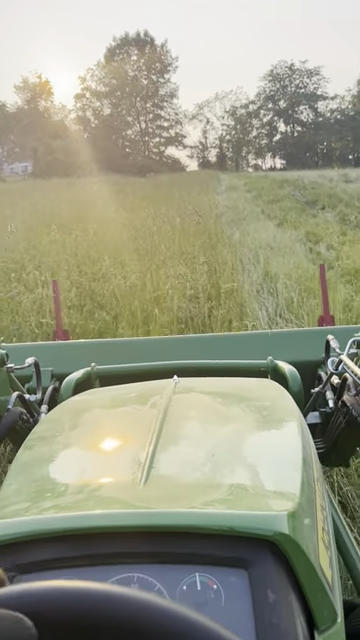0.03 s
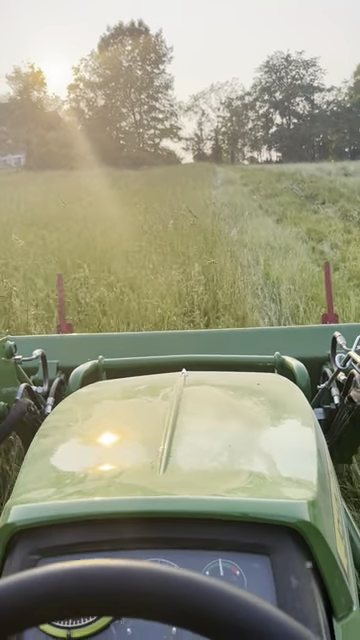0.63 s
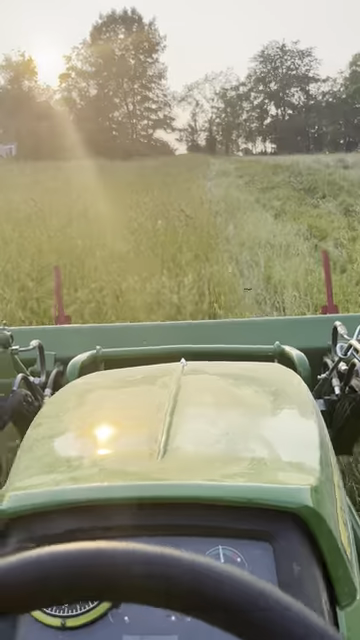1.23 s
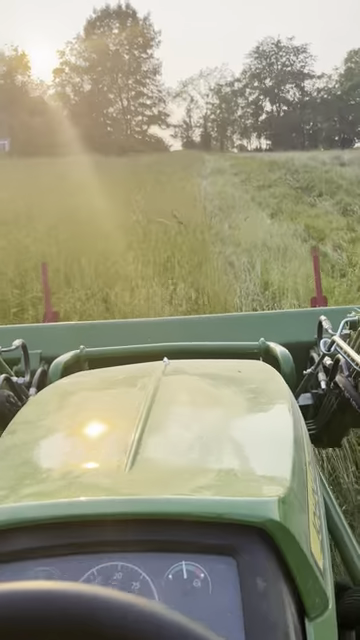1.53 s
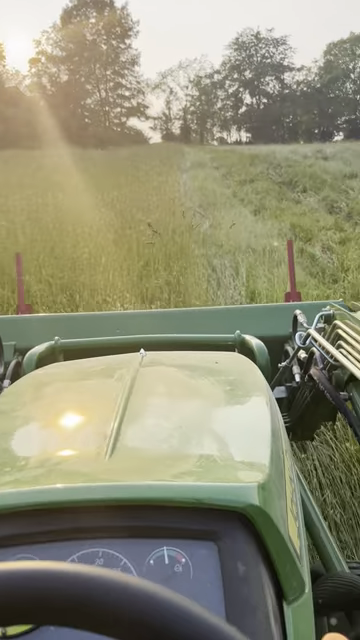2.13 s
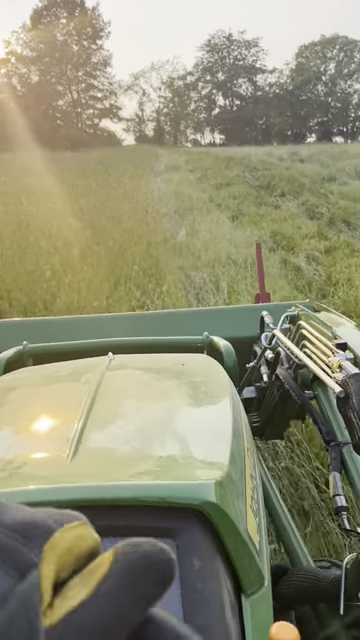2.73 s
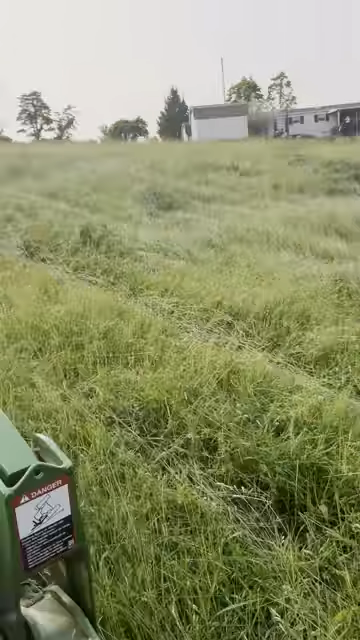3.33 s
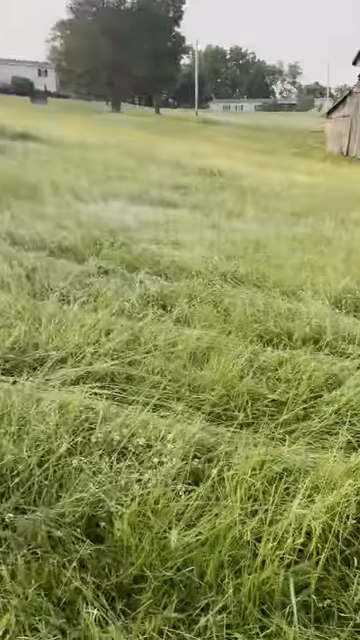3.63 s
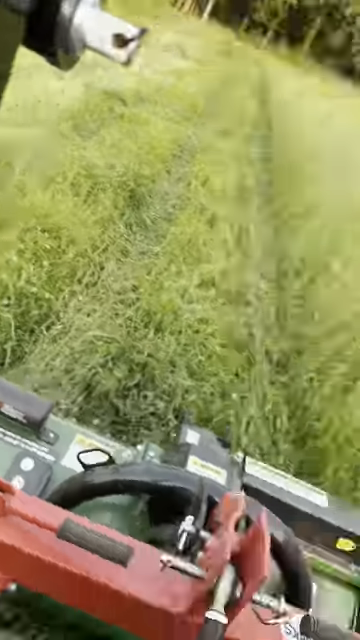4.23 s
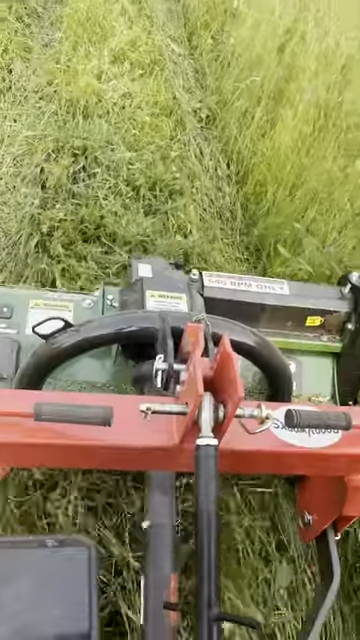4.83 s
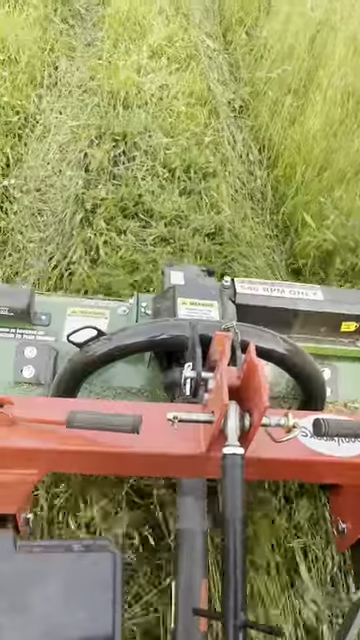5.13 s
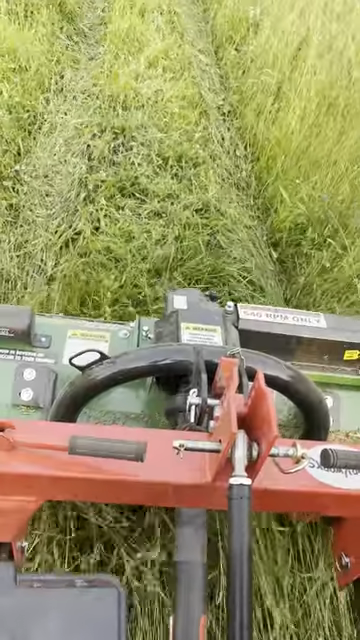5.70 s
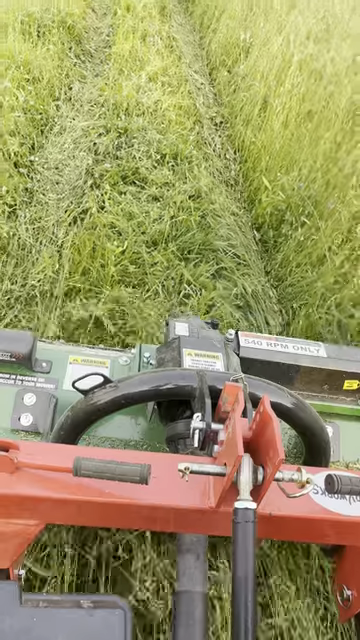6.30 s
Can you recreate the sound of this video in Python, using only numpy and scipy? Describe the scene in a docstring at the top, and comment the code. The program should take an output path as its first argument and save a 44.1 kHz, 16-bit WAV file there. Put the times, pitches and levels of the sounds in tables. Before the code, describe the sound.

Steady diesel engine drone from a tractor seat, shifting midway to the pulsing growl and ringing hiss of a mower cutting grass.

```python
"""A three-cylinder diesel tractor at close range, pulling a flail mower through a field of tall grass.
The microphone is a stereo phone in the open driver's seat. Just ahead, the exhaust pulses drone,
combustion knocks the block and the timing gears whine. Behind, the drive shaft makes the gearbox throb
and flails pelt the mower's steel hood with grass. Near four seconds the phone swings from the bonnet
round to the mower."""
import sys
import numpy as np
from scipy import signal
from scipy.fft import rfft, irfft
from scipy.io import wavfile

SR = 44100
rng = np.random.default_rng(int(sys.argv[2]) if len(sys.argv) > 2 else 0)


def wav_record(signal):
    """Record a signal, one row per channel, as 16-bit PCM in the file named by sys.argv[1]."""
    frames = np.transpose(np.atleast_2d(signal))
    bounded = np.clip(frames, -1, 1)
    # unit amplitude maps onto the largest positive 16-bit level
    quanta = np.round(bounded * 32767).astype(np.int16)
    wavfile.write(sys.argv[1], SR, quanta)


N = 284886
T = np.arange(N) / SR
FREQ = np.fft.rfftfreq(N, 1 / SR)


# exhaust lines, just ahead of the seat: (order [per cycle], relative level [dB], shading [dB per dB])
EXHAUST_LINES = [(2, -26.5, 0.26), (3, 0.5, 1.09), (4, -18, 0.61), (6, -3.5, 1.92), (7, -26, 0.2),
                 (9, -15.5, 4.2), (15, -18.5, 1.2)]

def exhaust(cycle):
    """Three firings per two-turn cycle make steep pulses; unequal cylinders add weak lines between."""
    level_db = facing(-19, -22.5, -25)
    top_db = np.max(level_db)
    out = 0
    for k, db, shading in EXHAUST_LINES:
        lead_turns = .25 * (k > 4)  # leading overtones steepen the front
        line = tone(round(k) * cycle + lead_turns, waver_db=.055 * k, waver_rad=.008 * k)
        # each line fades at its own rate as the microphone turns away
        out = out - line * undb(top_db + db + shading * (level_db - top_db))
    return out


# roar of the block under the bonnet: (frequency [Hz], level [dB per Hz])
BLOCK_ROAR = [(25, -80), (40, -70), (60, -56.5), (130, -57), (230, -48), (330, -49), (480, -56),
              (700, -56.5), (1400, -66.5), (2350, -69), (2800, -71.5), (3500, -72), (5000, -77.5),
              (7000, -79.5), (15500, -93.5)]
# modes of the engine covers: (frequency [Hz], width [Hz], peak level [dB per Hz])
COVER_MODES = [(1310, 70, -61), (2426, 150, -66), (3420, 630, -71), (6180, 470, -73), (6890, 310, -74),
               (7380, 300, -89)]

def block():
    """Diesel clatter: a broad roar with the ringing of the covers."""
    covers = modes(COVER_MODES)
    return (colour(hiss(), BLOCK_ROAR) + covers) * undb(.81 * walk(4.5))


# combustion knock, close ahead: (frequency [Hz], level [dB per Hz])
KNOCK_SPECTRUM = [(40, -86), (150, -65), (300, -55), (480, -69), (750, -59.5), (1400, -74), (1900, -74),
                  (2800, -80), (15500, -110)]
FIRES_AT = .47  # share of a firing period

def knock(cycle, decay_s=.0044):
    """Each of the three cylinders knocks the block with its own short rattle, the same in every cycle."""
    out = 0
    for cylinder in range(3):
        rattle = rng.standard_normal(2048) * np.exp(-T[:2048] / decay_s)
        fires = strikes(cycle - (cylinder + FIRES_AT) / 3, scatter_db=2)
        out = out + signal.fftconvolve(fires, rattle)[:N]
    return colour(unit(out) * np.sqrt(SR / 2), KNOCK_SPECTRUM)


# injector tick from the bonnet: (frequency [Hz], level [dB per Hz])
INJECTOR_SPECTRUM = [(100, -110), (2500, -79), (4000, -89), (5500, -76), (7100, -76), (9000, -79),
                     (12500, -83), (15500, -92)]

def injectors(firings, decay_s=.0099, cylinder_db=(-2, 1.5, -6.5)):
    """A short bright tick opens each firing; the three injectors differ in strength."""
    turns = firings - FIRES_AT
    strength = undb(cylinder_db)[np.floor(turns).astype(int) % 3]
    ticks = strikes(turns, scatter_db=3.5) * strength
    bursts = signal.fftconvolve(ticks, np.exp(-T[:2048] / decay_s))[:N]
    return colour(unit(bursts) * hiss(), INJECTOR_SPECTRUM) * undb(facing(-.5, -18, -4))


# hum of block and pumps, ahead: (order [per cycle], level [dB])
HUM_LINES = [(10.85, -36), (14, -42), (24, -39), (28, -37.5), (30.6, -43.5), (33, -50), (42, -45.5),
             (49, -48), (50, -49.5), (57, -58), (70, -48)]
# timing gear whine at the seat: (time [s], level [dB])
WHINE_LEVEL = [(0, -39), (.76, -40), (.81, -46), (.86, -35), (.95, -45), (1.1, -40), (1.24, -34),
               (1.33, -41), (1.46, -36), (1.53, -45), (1.6, -34), (1.79, -36.5), (1.85, -47), (2.14, -35.5),
               (2.25, -46), (2.35, -37.5), (2.6, -41), (2.8, -37), (3.16, -35), (3.38, -52), (3.71, -37),
               (3.86, -48), (4.2, -41), (4.5, -54)]
# its octave, which carries better to the rear: (time [s], level [dB])
OCTAVE_LEVEL = [(0, -51), (1.3, -51.5), (2.1, -57), (2.9, -50.5), (3.8, -52.5), (4.2, -48), (5.4, -47),
                (6.0, -44.5), (6.35, -41.5)]
# transmission whine, heard from behind with the mower: (order [per cycle], level [dB])
TRANSMISSION_LINES = [(48, -52), (96.1, -41.5)]

def engine_tones(cycle, block_db, mower_db, fan_order=15.32, mesh_order=84):
    """Block, pumps and fan blades hum; the timing gears and the transmission whine."""
    hum = sum(undb(db) * tone(k * cycle, waver_db=-.5, waver_rad=.11) for k, db in HUM_LINES)
    fan = tone(fan_order * cycle, waver_db=2.5, waver_rad=.1) * undb(facing(-33.5, -29.5, -38.5))
    mesh = mesh_order * cycle
    whine = tone(mesh, waver_db=.7, waver_rad=.19) * undb(curves(WHINE_LEVEL)[0])
    octave = tone(2 * mesh, waver_db=1.6, waver_rad=.8) * undb(curves(OCTAVE_LEVEL)[0])
    transmission = sum(undb(db) * tone(k * cycle, waver_db=1.5, waver_rad=.5)
                       for k, db in TRANSMISSION_LINES)
    return hum * undb(block_db) + transmission * undb(mower_db) + fan + whine + octave


# grass being shredded behind the tractor: (frequency [Hz], level [dB per Hz])
GRASS_SPECTRUM = [(30, -79.5), (60, -93), (160, -51.5), (235, -56.5), (310, -43), (420, -55), (600, -51.5),
                  (950, -63), (1300, -61.5), (1780, -60.5), (2120, -65), (2400, -61.5), (3100, -67),
                  (7200, -76), (10000, -81), (13000, -80), (15500, -88)]
# modes of the mower's steel hood: (frequency [Hz], width [Hz], peak level [dB per Hz])
HOOD_MODES = [(499.3, 37, -52.5), (658.4, 30, -45.5), (769, 59, -56.5), (1114, 38, -55.5),
              (1407, 27, -52.5), (1473, 9.6, -53), (1564, 19, -55.5), (1679, 17, -51.5), (1770, 17, -60),
              (1820, 100, -66.5), (2237, 29, -55.5), (2400, 100, -58), (2869, 49, -56.5), (3610, 40, -62.5),
              (5010, 290, -67), (5560, 97, -70), (6410, 80, -69), (7010, 170, -70)]

def flails(shaft):
    """Flails shred the grass and fling it at the hood, which rings harder at each surge of the drive."""
    impacts = .85 * hiss() + .5 * pelting(per_s=3500, spread_db=2.2)
    surge = np.cos(joint_angle(shaft))
    shredding = colour(impacts, GRASS_SPECTRUM) * (1 + .04 * surge)
    ringing = modes(HOOD_MODES) * (1 + .17 * surge)
    return shredding * undb(.91 * walk(28)) + ringing * undb(.3 * walk(12))


def joint_angle(shaft):
    """The universal joints speed and load the mower drive twice in each turn of the shaft."""
    return 2 * np.pi * 2 * shaft - 1


# tooth clash behind the seat: (mesh multiple, level [dB], bite at [turns], lopsidedness [-1 to 1])
CLASH_LINES = [(2, -41, 0.13, -0.4), (4, -59, .05, -0), (5, -35.5, 0.031, -.1), (6, -43.5, 0.055, 0.6),
               (7, -40.5, 0.22, -0.16), (8, -38, .05, -0.05), (10, -49, 0.16, 0.14), (11, -48, 0.18, 0.3)]
# lift of the clash above the fifth multiple: (time [s], level [dB])
CLASH_LIFT = [(4.0, -5), (4.4, -2.5), (5.15, 3.5), (5.45, 2), (6.46, 0.5)]

def gearbox(shaft, load_db, mower_db, teeth=32, lag_rad=.95, runout_rad=.15, rattle_rad=.11):
    """Teeth mesh in the mower drive: a growl throbs with each surge, and overtones clash in bursts."""
    surge = joint_angle(shaft) - lag_rad
    throb = 1 + .87 * np.cos(surge) + .08 * np.cos(2 * surge)
    mesh = teeth * shaft
    growl = unit(throb * tone(mesh, waver_db=.5, waver_rad=.12))
    growl_db = facing(-32, -23, -21.5) + 1.64 * load_db
    # an off-centre gear bends the overtones once a turn, and loose teeth roughen them
    uneven = mesh + (rattle_rad * walk(24) - runout_rad * np.sin(2 * np.pi * shaft)) / (2 * np.pi)
    lift_db, = curves(CLASH_LIFT)
    clash = 0
    for k, db, at, lopsided in CLASH_LINES:
        angle = 2 * np.pi * (shaft - at)
        bite = unit((1 + .7 * np.cos(2 * angle)) * (1 + lopsided * np.cos(angle)))  # two bites a turn
        line = tone(round(k) * uneven + rng.random(), waver_db=0, waver_rad=.23)
        clash = clash + line * bite * undb(db + lift_db * (round(k) > 5))
    return growl * undb(growl_db) + clash * undb(1.1 * mower_db)


# modes of the gearbox casing: (frequency [Hz], width [Hz], peak level [dB per Hz])
CASING_MODES = [(322, 53, -67), (494, 25, -51), (565, 79, -56), (648, 240, -63), (960, 390, -67)]

def backlash(shaft, at_turns=.57):
    """Once in each turn of the shaft the slack closes with a clack that rings the gearbox casing."""
    clacks = strikes(shaft - at_turns, scatter_db=-3)
    return shape(clacks, sum(undb(db) * resonance(hz, width) ** 2 for hz, width, db in CASING_MODES))


def rotor(turns):
    """Four rows of flails beat the air in each turn of the rotor."""
    return tone(4 * turns, waver_db=3.5, waver_rad=.14) * undb(facing(-37.5, -37, -31.5))


# thick tufts under the hood: (time [s], half-length [s], frequency [Hz], level [dB])
TUFT_HITS = [(4.181, 0.02, 655, -18), (4.28, 0.02, 1410, -30), (6.0, 0.06, 503, -23.5),
             (6.035, 0.016, 655, -27)]

def tufts():
    """Each thick tuft makes one mode of the hood ring out for a moment."""
    return sum(undb(db) * swell(s, length) * tone(hz * T, waver_db=1, waver_rad=.3)
               for s, length, hz, db in TUFT_HITS)


# single stalks snapping against the steel: (time [s], frequency [Hz], level [dB])
STALK_SNAPS = [(.487, 7000, -37), (1.497, 12000, -43), (1.606, 6800, -40), (1.719, 6900, -41),
               (1.844, 7140, -35), (2.148, 12000, -47), (3.476, 7160, -46), (4.625, 7100, -43),
               (5.458, 12500, -41)]

def snaps(decay_s=.019, width_hz=570):
    """A stiff stalk breaks: a sudden bright burst with a short tail."""
    noise = hiss()
    out = 0
    for s, hz, db in STALK_SNAPS:
        tail = (T >= s) * np.exp(-np.abs(T - s) / decay_s)
        out = out + undb(db) * tail * unit(shape(noise, resonance(hz, width_hz) ** 2))
    return out


# dry stalks, faint under the machines: (time [s], relative level [dB])
STALK_LEVEL = [(0, 3), (1.1, -4), (1.5, 3), (1.9, 7), (2.4, -5), (3.9, 1), (4.3, 6), (5.0, 3), (6.46, 8)]

def stalks(per_s=170, decay_s=.0025):
    """Dry stalks tick on the steel: dense short bright bursts of uneven strength."""
    hits = (rng.random(N) < per_s / SR) * rng.uniform(.25, 1, N)
    bursts = signal.fftconvolve(hits, np.exp(-T[:4096] / decay_s))[:N] * hiss()
    ticks = shape(bursts, resonance(7100, 1100) ** 2 + .13 * resonance(12500, 4000) ** 2)
    return unit(ticks) * undb(facing(-49, -62, -55) + curves(STALK_LEVEL)[0] + .3 * walk(2.7))


# faint buzzes from the bonnet: (time [s], half-length [s], level [dB])
COVER_BUZZES = [(.92, 0.12, -42), (2.42, .08, -40)]

def cover_buzz(hz=1296):
    """A loose engine cover buzzes up now and then."""
    swells = sum(undb(db) * swell(s, length) for s, length, db in COVER_BUZZES)
    return swells * tone(hz * T, waver_db=2, waver_rad=1.5)


def surround(block_db, mower_db):
    """Diffuse noise of engine and mower reaches the seat from all round."""
    engine = colour(hiss(), BLOCK_ROAR) * undb(block_db)
    grass = colour(hiss(), GRASS_SPECTRUM) * undb(mower_db)
    return (engine + grass) * undb(facing(-1.5, 2.5, 0))


# aim of the microphone: (time [s], bearing [degrees: 0 bonnet, 90 sideways, 180 mower])
MIC_BEARING = [(2.3, 25.4), (3.1, 30.2), (3.45, 59.7), (3.8, 77), (4.0, 135), (4.2, 160), (4.5, 169.3)]

def facing(ahead_db, sideways_db, behind_db):
    """Level of a sound over time as the microphone swings round."""
    bearing, = curves(MIC_BEARING)
    return np.interp(bearing, (0, 90, 180), (ahead_db, sideways_db, behind_db))


# phase between the two microphone ports: (frequency [Hz], lead of the left [rad])
MIC_PHASE = [(0, 0), (130, 0), (430, -.3), (1450, -.25), (2150, .85), (2450, 1.85), (3000, 1.85),
             (3790, 1.15), (5000, 1.45), (5550, 2.1), (5950, 3.14), (6400, 4.2), (8000, 6.28),
             (10300, 9.42), (12400, 12.57), (16000, 17.5)]
# colour of the ports: (frequency [Hz], left minus right [dB], diffuse share [dB])
MIC_COLOUR = [(70, 0, -14), (160, 0, -19), (350, .7, -10), (800, 1, -9), (1500, -.5, -10), (2200, 0, -11),
              (2700, -2.8, -7), (3500, -1, -7), (4500, -2, -6), (5900, 0, -11), (7000, 0, -10),
              (15000, 0, -13)]

def ports(direct, diffuse):
    """Direct sound reaches the two ports out of step; diffuse noise enters them with opposite signs."""
    balance_db, diffuse_db = spectra(MIC_COLOUR)
    lead = np.interp(FREQ, *np.transpose(MIC_PHASE))
    width = shape(diffuse, undb(diffuse_db))
    return np.array([shape(direct, np.exp(.5j * side * lead) * undb(side * balance_db / 2))
                     + side * width for side in (1, -1)])


# dips at the microphone: (time [s], half-length [s], frequency [Hz], width [Hz], level [dB])
TREBLE_DIPS = [(3.6, .2, 8200, 2500, 0), (3.893, 0.079, 3640, 800, -10), (4.06, 0.2, 4800, 1400, -1.5)]

def hollow(x):
    """Bands of the treble dip for a moment as the microphone swings past sideways."""
    return x + sum(shape(x, resonance(hz, width)) * (undb(db) - 1) * swell(s, length)
                   for s, length, hz, width, db in TREBLE_DIPS)


def undb(db):
    """Decibels to gain."""
    return 10 ** (np.asarray(db) / 20)


def curves(table):
    """The columns of a timed table, joined by straight lines."""
    s, *columns = np.transpose(table)
    return [np.interp(T, s, c) for c in columns]


def spectra(table):
    """The columns of a table over frequency, joined on a log axis."""
    hz, *columns = np.transpose(table)
    return [np.interp(np.log(FREQ + 1), np.log(hz), c) for c in columns]


def shape(x, response):
    """Filter by a frequency response."""
    return irfft(rfft(x) * response, N)


def colour(x, table):
    """Filter by a table of (frequency [Hz], level [dB])."""
    return shape(x, undb(spectra(table)[0]))


def unit(x):
    """Scale to rms 1."""
    return x / np.sqrt(np.mean(x ** 2))


def resonance(hz, width_hz):
    """Response of one mode, gain 1 at its centre."""
    return 1j * FREQ * width_hz / (hz ** 2 - FREQ ** 2 + 1j * FREQ * width_hz)


def modes(table):
    """Steady ringing of a steel panel: every mode is shaken by noise of its own."""
    return irfft(sum(rfft(hiss()) * undb(db) * resonance(hz, width) ** 2 for hz, width, db in table), N)


def hiss():
    """White noise of 0 dB per Hz."""
    return rng.standard_normal(N) * np.sqrt(SR / 2)


def walk(rate):
    """Smooth random drift of rms 1, moving about rate times a second."""
    hz = np.fft.rfftfreq(8192, 1 / 1000)
    slow = irfft(rfft(rng.standard_normal(8192)) * np.exp(-(hz / rate) ** 2) * (hz > 0))
    return unit(np.interp(T, np.arange(8192) / 1000, slow))


def tone(turns, waver_db, waver_rad):
    """A line of rms near 1 whose strength and phase waver at random."""
    return np.sqrt(2) * np.cos(2 * np.pi * turns + waver_rad * walk(4)) * undb(waver_db * walk(23))


def pelting(per_s, spread_db):
    """Dense random impacts, a few of them much harder; 0 dB per Hz."""
    hits = (rng.random(N) < per_s / SR) * rng.standard_normal(N)
    hardness = undb(spread_db * np.minimum(rng.exponential(size=N), 4))
    return unit(hits * hardness) * np.sqrt(SR / 2)


def strikes(turns, scatter_db):
    """One click in each turn, of uneven strength; 0 dB per Hz."""
    hits = np.diff(np.floor(turns), prepend=np.floor(turns[0]))
    return unit(hits * undb(scatter_db * rng.standard_normal(N))) * np.sqrt(SR / 2)


def swell(s, length):
    """A smooth bump of height 1 round a moment."""
    return np.exp(-((T - s) / length) ** 2)


# engine speed: (time [s], firing rate [Hz])
FIRING_RATE = [(0, 78.5), (1.6, 78.55), (2.4, 78.67), (3.9, 78.6), (5.3, 78.84), (6.46, 78.8)]
# weight of the grass on the mower: (time [s], load [dB])
GRASS_LOAD = [(0, -1), (3.9, -0.16), (4.8, 0.5), (5.3, -0.3), (6.46, -1)]
SHAFT_PER_FIRING, ROTOR_PER_FIRING = .11305, .4418  # turns

def scene():
    """From the seat: one engine drives every shaft, the swing sets the mix, heavy grass mows louder."""
    firing_hz = curves(FIRING_RATE)[0] + .0601 * walk(4.24)  # the governor hunts a little
    firings = np.cumsum(firing_hz) / SR
    cycle, shaft = firings / 3, firings * SHAFT_PER_FIRING
    load_db, = curves(GRASS_LOAD)
    block_db = facing(.35, -2.5, -9.5)
    mower_db = facing(-15, -8, .7) + load_db
    clatter = (block() + knock(cycle)) * undb(block_db) + injectors(firings) + cover_buzz()
    tractor = exhaust(cycle) + clatter + engine_tones(cycle, block_db, mower_db)
    drive = rotor(firings * ROTOR_PER_FIRING) + gearbox(shaft, load_db, mower_db)
    mower = (flails(shaft) + backlash(shaft)) * undb(mower_db) + drive + tufts()
    machines = tractor + mower
    # facing sideways, the microphone catches less treble from either machine
    treble = shape(machines, FREQ ** 4 / (FREQ ** 4 + 5000 ** 4))
    direct = machines + treble * (undb(facing(-.5, -3, -2)) - 1) + stalks() + snaps()
    return hollow(ports(direct, surround(block_db, mower_db)))


def record(dry):
    """The phone passes nothing above 15750 Hz."""
    return shape(dry, FREQ < 15750)


dry = scene()
out = record(dry)
wav_record(out)
```